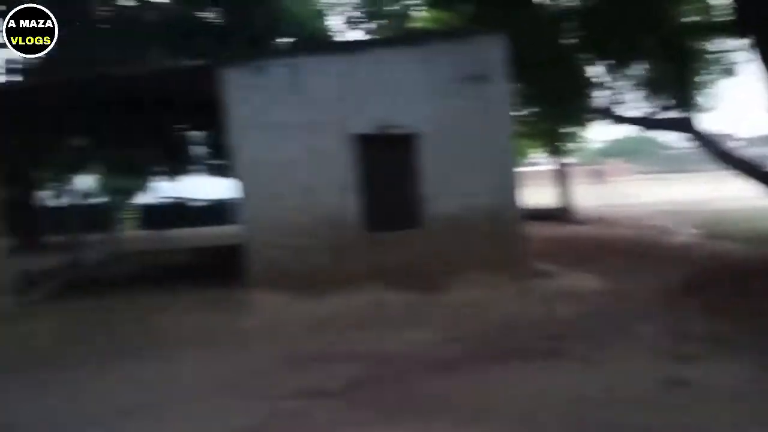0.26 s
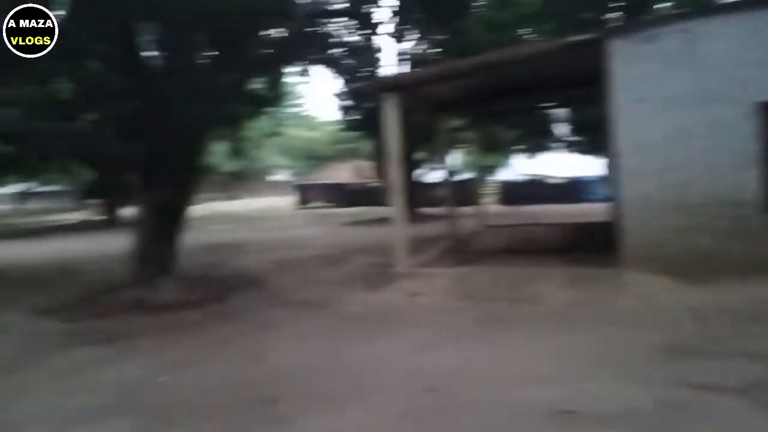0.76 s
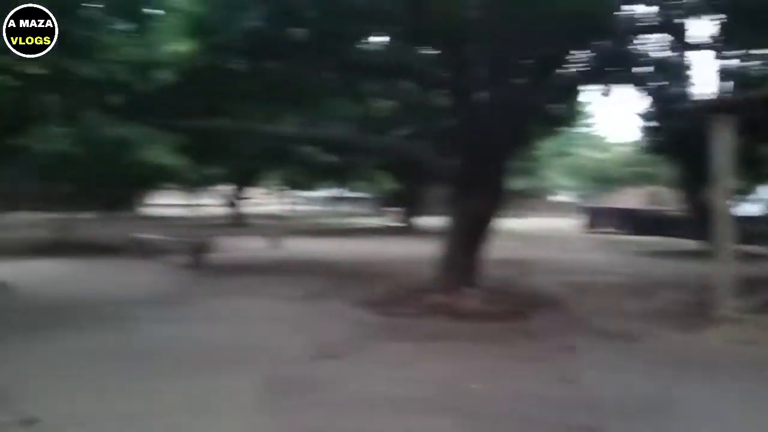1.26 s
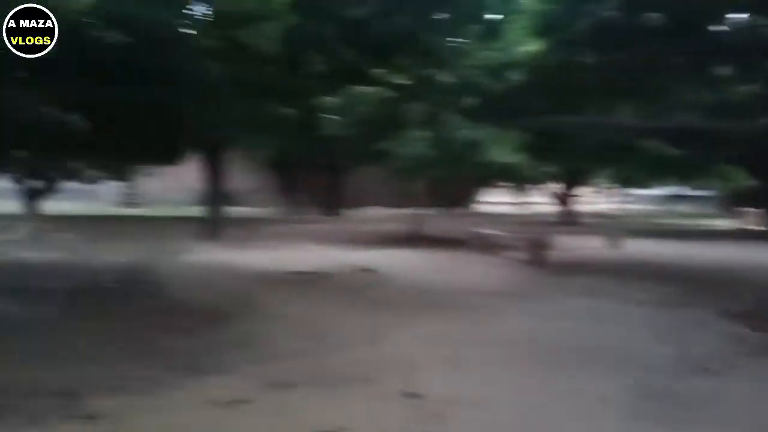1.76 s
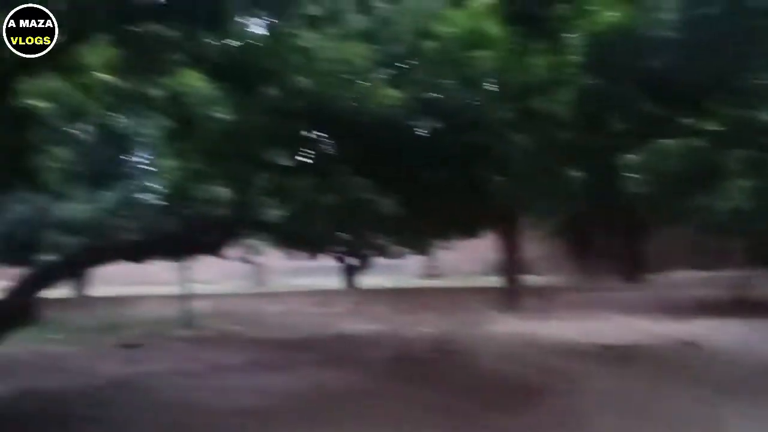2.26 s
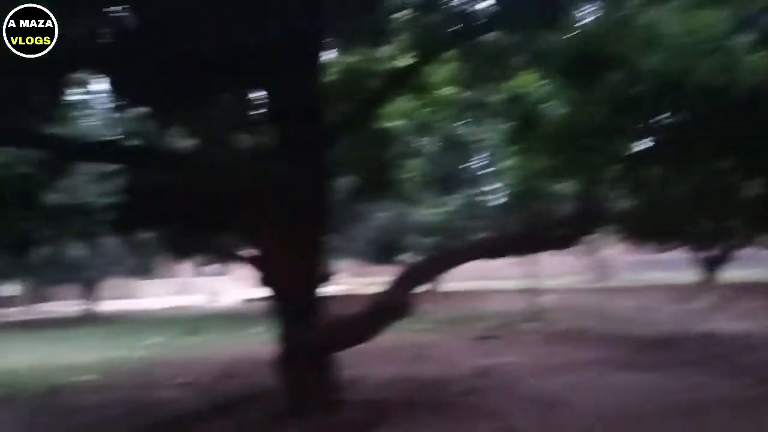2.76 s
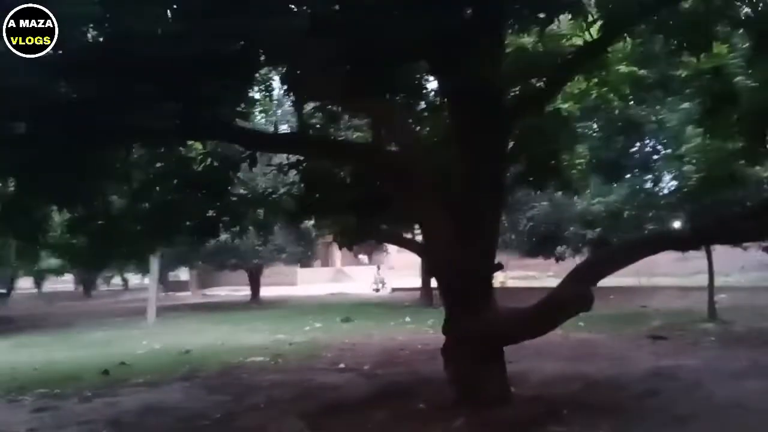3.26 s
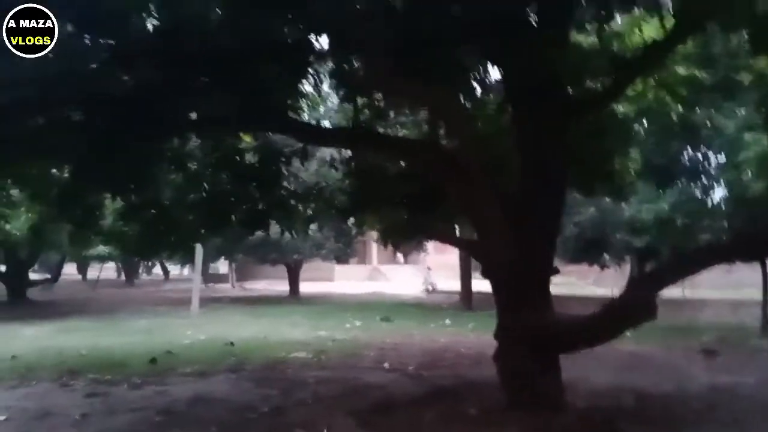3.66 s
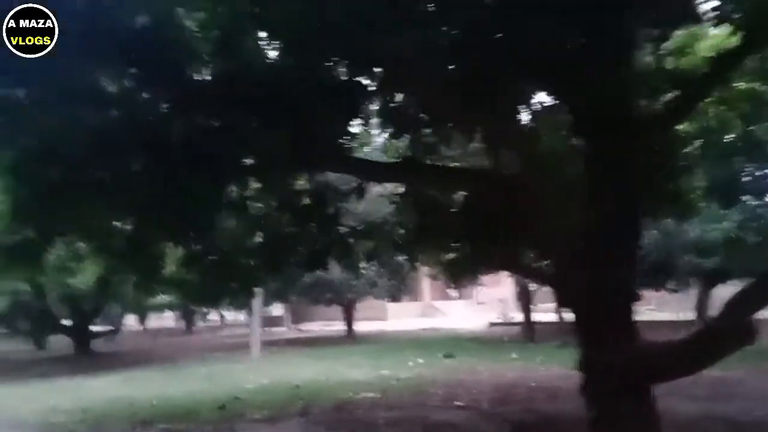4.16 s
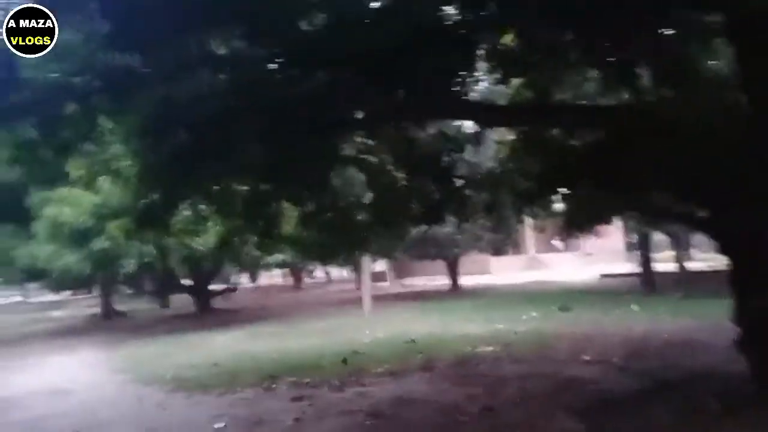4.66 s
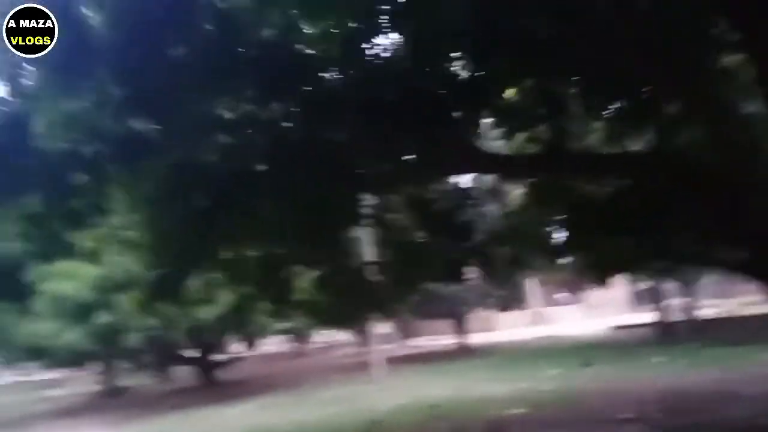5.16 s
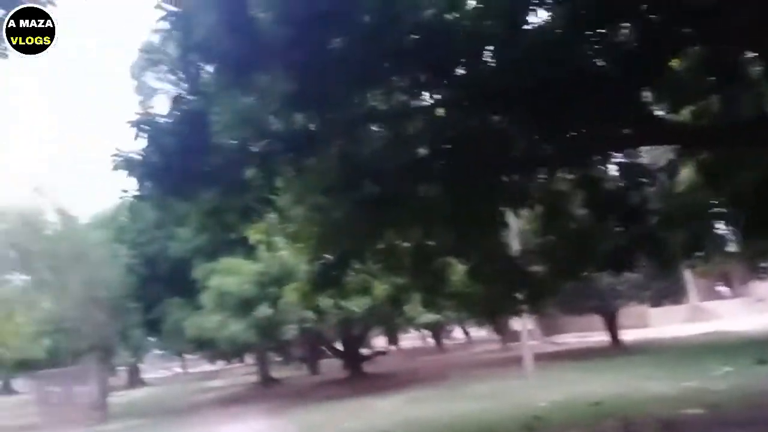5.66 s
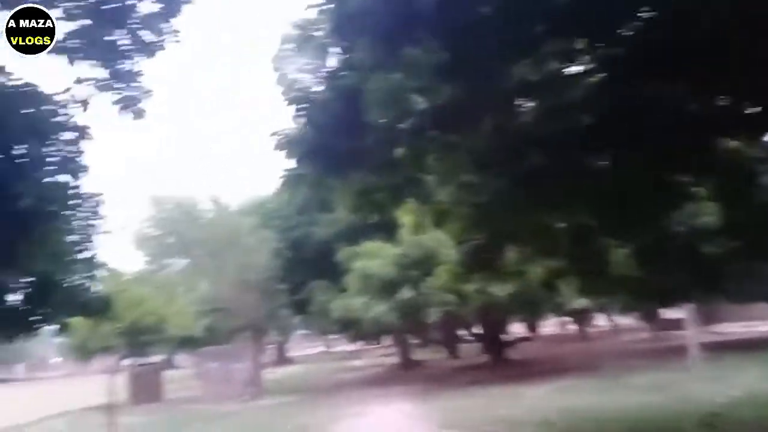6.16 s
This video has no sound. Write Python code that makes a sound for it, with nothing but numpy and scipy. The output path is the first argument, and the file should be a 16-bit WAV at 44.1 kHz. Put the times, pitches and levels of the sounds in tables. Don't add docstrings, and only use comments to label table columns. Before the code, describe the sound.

Cicadas drone steadily through an orchard, one nearer insect swelling and fading, while small birds slur and chirp, distant fowl call, and twigs snap underfoot.

```python
import sys
import numpy as np
from scipy import signal
from scipy.fft import rfft, irfft, next_fast_len
from scipy.io import wavfile
from scipy.ndimage import uniform_filter1d

SR = 44100
rng = np.random.default_rng(int(sys.argv[2]) if len(sys.argv) > 2 else 0)


def makeup_ratio(level_db):
    decades = np.asarray(level_db, float) / 20
    return 10 ** decades


def materialize(psi):
    bounded = np.clip(np.atleast_2d(psi).T, -1, 1)
    quanta = np.round(bounded * 32767).astype(np.int16)
    wavfile.write(sys.argv[1], SR, quanta)


N = 282681
T = np.arange(N) / SR


def rms_one(x):
    return x / np.sqrt(np.mean(np.abs(x) ** 2) + 1e-20)


def in_time(rows):
    s, level_db = np.transpose(rows)
    return np.interp(T, s, level_db)


def drift(rate_hz, size=N):
    r = np.exp(-32 * np.pi * rate_hz / SR)
    noise = rng.standard_normal(size // 16 + 1002)
    slow = signal.lfilter([1], [1, -2 * r, r * r], noise)[1000:]
    return np.interp(np.arange(size) / 16, np.arange(len(slow)), rms_one(slow))


def colour(x, spectrum):
    hz, level_db = np.transpose(spectrum)
    padded = next_fast_len(N)
    axis = np.fft.rfftfreq(padded, 1 / SR) + 1
    gain = makeup_ratio(np.interp(np.log(axis), np.log(hz), level_db, left=-150, right=-150))
    return rms_one(irfft(rfft(x, padded) * gain)[:N])


def butter(x, order, hz, kind):
    return signal.sosfilt(signal.butter(order, hz, kind, fs=SR, output="sos"), x)


def resonance(x, hz, width_hz):
    r = np.exp(-np.pi * width_hz / SR)
    poles = [1, -2 * r * np.cos(2 * np.pi * hz / SR), r * r]
    return signal.lfilter([(1 - r * r) / 2, 0, (r * r - 1) / 2], poles, x)


def trees(x, t60, wet_db):
    age = T[:SR // 2]
    tail = rng.standard_normal(len(age)) * makeup_ratio(-60 * age / t60) * np.minimum(age / 0.0096, 1)
    tail = tail / np.sqrt(np.sum(tail ** 2))
    return x + makeup_ratio(wet_db) * signal.fftconvolve(x, tail)[:N]


def smooth_cells(cells, bands, frames):
    return uniform_filter1d(uniform_filter1d(cells, size=bands, axis=0), size=frames, axis=1)


def click_train(per_s, start, jitter, wander=0):
    k = np.arange(int(T[-1] * per_s) - 1)
    slow = drift(4)[(k / per_s * SR).astype(int)]
    at = (k + 1 - start + jitter * rng.standard_normal(len(k)) + wander * slow) / per_s
    strength = makeup_ratio(0.32 * rng.standard_normal(len(k)))
    clicks = np.full(N, 1e-18)
    clicks[np.clip(at * SR, 0, N - 1).astype(int)] = (-1.) ** k * strength
    return clicks


def ribs(x, rings):
    return x + sum(makeup_ratio(ring_db) * resonance(x, hz, width_hz) for hz, width_hz, ring_db in rings)


def far_cicadas():
    # (time [s], level [dB])
    drone = [(0, -35), (.4, -38), (1.8, -37), (3.6, -36.5), (4.6, -37.5), (5.0, -38), (5.35, -36.5),
             (6.41, -39)]
    # (frequency [Hz], density [dB per Hz])
    body_spectrum = [(3290, -2.5), (5600, -26.5), (6000, -13), (6850, 3.5), (7800, 4), (8800, -9.5),
                     (9430, -21), (11500, -31.5), (15000, -86), (22000, -120)]
    top_spectrum = [(10800, -27), (11500, -17), (12300, -6), (14700, 0.5), (15650, 1.0)]
    # (frequency [Hz], width [Hz], level [dB])
    shared_rings = [(7146, 48, -4.5), (7710, 59, -1), (5970, 52, -3.5)]
    # (time [s], level [dB])
    facing = [
        (0, -5),
        (1.8, -3),
        (4.1, -0.5),
        (5.35, -9),
        (6.41, -5),
    ]
    swarm = 0
    for per_s, throb_hz in zip(rng.uniform(380, 450, 12), rng.uniform(20, 33, 12)):
        throb_db = 4.0 * np.cos(2 * np.pi * throb_hz * T + 3 * drift(.5)) + .6 * drift(1.5)
        swarm = swarm + click_train(per_s, 0, jitter=.15) * makeup_ratio(throb_db)
    body = colour(ribs(trees(swarm, t60=.5, wet_db=0), shared_rings), body_spectrum)
    body = butter(makeup_ratio(in_time(drone)) * body, 12, 5750, "high")
    flutter_db = 2.2 * drift(14) + 1.6 * drift(4.5)
    top = colour(trees(swarm, t60=.2, wet_db=-31), top_spectrum)
    return body + makeup_ratio(-60.5 + in_time(facing) + flutter_db) * top


def near_cicada():
    # (time [s], level [dB])
    effort = [
        (.9, -67),
        (1.2, -44.5),
        (1.75, -36),
        (2.0, -31),
        (2.3, -29.5),
        (2.6, -33),
        (3.3, -40),
        (4.3, -46.5),
        (4.7, -74),
    ]
    # (time [s], level [dB])
    top_under = [(1.1, -19), (1.6, -10.5), (2.2, -17.5), (2.7, -23.5), (3.2, -28)]
    # (frequency [Hz], density [dB per Hz])
    drum_body = [(3410, -4), (5800, -31.5), (6070, -9.5), (6530, -17.5), (7070, 1.5), (7440, 1.5),
                 (8400, -4), (8790, -12), (8910, -9.5), (9350, -25), (9840, -17.5), (11400, -48),
                 (14800, -54), (22000, -120)]
    drum_top = [(6650, -44), (11400, -17), (12800, -5), (14700, 1), (15650, 0.5)]
    # (frequency [Hz], width [Hz], level [dB])
    drum_rings = [(6870, 77, 0), (7175, 41, 3.5), (7390, 36, -0.5), (7680, 45, 5), (8070, 26, 6),
                  (8540, 47, 3)]
    # (loudest point within the throb cycle [0-1], depth of the rest [dB])
    throbs = [(.6, 9), (.3, 9)]
    clicks_per_s, throbs_per_s = 416.28, 26.85
    clicks = click_train(clicks_per_s, .32, jitter=.04, wander=.06)
    clicks = trees(clicks, t60=.15, wet_db=-1.5)
    effort_db = in_time(effort)
    levels_db = (effort_db, effort_db + in_time(top_under))
    out = 0
    for spectrum, (peak, depth_db), level_db in zip((drum_body, drum_top), throbs, levels_db):
        cycle = np.sin(np.pi * (throbs_per_s * T - peak)) ** 4
        throb = makeup_ratio(-depth_db * makeup_ratio(1.6 * drift(6)) * cycle)
        out = out + makeup_ratio(level_db) * colour(ribs(clicks * throb, drum_rings), spectrum)
    return butter(out, 12, 5750, "high")


def sung_notes(table, warble_hz, flutter_db, bend, trill_hz):
    out = np.zeros(N)
    for start, length, from_hz, to_hz, level_db in table:
        a, b = int(start * SR), int((start + length) * SR)
        size = b - a
        u = np.linspace(0, 1, size)
        trill = np.sin(2 * np.pi * np.cumsum(trill_hz * (1 + .1 * drift(31.5, size))) / SR)
        hz = from_hz * (to_hz / from_hz) ** (u ** bend)
        hz = hz + warble_hz * (trill + 0.299 * drift(15.5, size))
        shape = np.minimum(1, 5.0 * np.minimum(u, .6 * (1 - u))) ** 1.3
        shape = shape * makeup_ratio(level_db + flutter_db * drift(55, size))
        out[a:b] += np.sqrt(2) * shape * np.sin(2 * np.pi * np.cumsum(hz) / SR)
    return out


def sagging(table, sag):
    return [(start, length, hz, hz * sag, level_db) for start, length, hz, level_db in table]


def small_birds():
    # (start [s], length [s], from [Hz], to [Hz], level [dB])
    slurs = [(0, 0.094, 3700, 3375, -58), (3.17, .12, 3830, 3530, -62), (.14, 0.3, 4540, 3530, -55.5),
             (.36, 0.35, 3460, 3100, -73), (.75, 0.13, 3500, 4980, -59), (.86, 0.14, 4860, 4800, -65),
             (.87, .1, 4440, 4380, -73), (1.0, 0.11, 4200, 3700, -58), (1.07, .11, 3800, 3770, -64),
             (1.31, 0.1, 3054, 3400, -55.5), (1.43, 0.117, 3680, 3750, -55.5),
             (1.8, 0.073, 4300, 3700, -55), (4.62, .25, 3800, 3500, -57), (5.07, 0.1794, 3520, 3450, -60.5),
             (1.66, 0.13, 2753, 3116, -54.5), (1.785, .06, 4730, 3730, -53),
             (1.82, 0.14, 3870, 3790, -54.5), (1.26, 0.11, 3910, 3580, -58),
             (1.95, 0.25, 4003, 3684, -47.5), (2.41, .1, 3800, 3610, -50), (2.49, 0.19, 3340, 3210, -58),
             (.29, .09, 3980, 3750, -50.5), (3.07, 0.16, 3647, 3520, -50), (2.16, 0.18, 3754, 3500, -49.5),
             (2.37, .31, 4110, 3170, -49), (2.645, 0.39, 4345, 3410, -48), (3.05, 0.33, 3707, 3120, -52.5),
             (3.39, 0.16, 3900, 3290, -52.5), (3.52, 0.15, 3400, 3606, -54),
             (3.71, 0.22, 4420, 3370, -47.5), (4.2, 0.29, 4030, 3177, -49), (4.58, 0.33, 4110, 3732, -49),
             (4.77, 0.13, 3450, 3377, -62), (.92, 0.038, 3365, 3150, -55.5),
             (4.97, 0.12, 3833, 3830, -52.5), (5.06, 0.11, 3550, 3275, -50.5)]
    # (start [s], length [s], pitch [Hz], level [dB])
    chips = [(.41, 0.075, 3210, -59), (.51, 0.037, 3220, -62), (4.5, 0.048, 3800, -74),
             (.63, 0.11, 2760, -67.5), (.63, 0.084, 4110, -64.5), (.925, 0.015, 3405, -48),
             (.98, 0.1, 3330, -68), (1.12, 0.023, 3360, -54), (1.53, 0.16, 3327, -63.5),
             (1.9, 0.15, 3000, -67.5), (2.1, 0.09, 2460, -63), (3.1, 0.041, 5350, -55.5),
             (3.31, 0.044, 2533, -51), (3.67, 0.075, 2806, -54.5), (4.16, 0.048, 1944, -49),
             (4.68, 0.18, 2880, -61), (4.95, 0.087, 3037, -62.5), (5.47, 0.18, 3750, -75),
             (1.65, .07, 3730, -71), (5.17, 0.27, 5950, -70), (5.24, .12, 5150, -76), (1.4, .03, 4450, -70),
             (.4, .03, 4450, -69), (2.95, .04, 5150, -66)]
    # (start [s], length [s], from [Hz], to [Hz],
    # level [dB])
    glides = [(1.25, .085, 4150, 2980, -50), (1.385, .075, 3560, 3920, -50), (1.73, .13, 2520, 1930, -63),
              (2.345, .05, 2500, 2480, -60), (.575, .05, 2960, 2760, -52), (.405, .04, 2950, 2960, -52.5),
              (.5, .045, 2560, 2550, -56), (.34, .07, 2650, 2480, -65), (1.61, .07, 2560, 2800, -57),
              (6.27, .1, 1750, 1400, -61), (6.295, .06, 3200, 3120, -59)]
    song = sung_notes(slurs, 115, flutter_db=3.5, bend=0.74, trill_hz=161.0)
    clear = sung_notes(sagging(chips, .975), 50, flutter_db=5.5, bend=0.98, trill_hz=98.0)
    clear = clear + sung_notes(glides, 35, flutter_db=4.5, bend=0.9, trill_hz=59.0)
    return trees(song, t60=0.52, wet_db=2.0) + trees(clear, t60=0.33, wet_db=-1.0)


def whistles():
    # (start [s], length [s], level [dB], loudest pitch [Hz], scattered share [dB])
    falls = [
        (5.672, .172, -43, 3500, 3),
        (5.928, .16, -49, 4300, -5),
    ]
    # (share of the length [0-1], pitch [Hz])
    fall_pitch = [(0, 5780), (.12, 5600), (.33, 4450), (.55, 3750), (.8, 3080), (1, 2420)]
    edge_s, db_per_octave = 0.012, 5
    out = np.zeros(N)
    for start, length, level_db, loudest_hz, wet_db in falls:
        age = T[T < length]
        shape = np.minimum(1, np.minimum(age, length - age) / edge_s)
        pitch_hz = np.interp(age / length, *np.transpose(fall_pitch))
        pitch_hz = uniform_filter1d(pitch_hz, size=700, mode="nearest") + 45 * drift(90, len(age))
        off_octaves = np.abs(np.log2(pitch_hz / loudest_hz))
        swell_db = level_db + 4.5 - db_per_octave * off_octaves + 2.9 * drift(32, len(age))
        a = int(start * SR)
        note = np.zeros(N)
        note[a:a + len(age)] = shape * makeup_ratio(swell_db) * np.sin(2 * np.pi * np.cumsum(pitch_hz) / SR)
        out += trees(note, t60=0.49, wet_db=wet_db)
    return resonance(out, 3600, 4500)


def coos_and_hoots():
    # (start [s], length [s], from [Hz], to [Hz], level [dB])
    coos = [(.07, 0.11, 630, 645, -69.5), (.3, .05, 805, 960, -77), (.66, 0.58, 816, 764, -72),
            (1.04, 0.082, 569, 580, -71), (1.94, 0.072, 680, 630, -58), (2.04, 0.59, 694, 624, -61.5),
            (2.61, 0.048, 663, 682, -54.5), (2.66, 0.11, 647, 624, -73), (2.88, 0.1443, 634, 748, -65),
            (3.07, 0.5, 719, 681, -60.5), (3.58, 0.13, 611, 711, -68), (3.71, 0.17, 708, 770, -56.5),
            (4.92, 0.112, 1160, 1332, -54), (5.5, 0.31, 420.5, 303.6, -71.5)]
    # (start [s],
    # length [s], pitch [Hz], level [dB])
    hoots = [(.06, 0.092, 1075, -64), (.2, 0.053, 1404, -66), (.49, 0.085, 1262, -66.5),
             (.585, 0.088, 1166, -69), (.68, 0.07, 1550, -62), (.755, 0.07, 1157, -75),
             (1.55, 0.062, 996, -67), (1.62, 0.024, 1164, -58), (1.74, 0.043, 1330, -65),
             (1.79, 0.086, 1282, -66), (5.1, 0.078, 945, -58), (5.35, 0.12, 1318, -59.5),
             (5.82, 0.097, 1164, -61), (6.2, .12, 2423, -66), (2.04, 0.17, 1470, -58.5),
             (2.25, 0.11, 1470, -62.5), (2.15, 0.14, 1260, -64), (2.34, .04, 1260, -67),
             (2.6, 0.075, 1200, -65), (2.74, .25, 1440, -56.5), (3.0, .16, 1410, -50.5),
             (3.2, 0.065, 1060, -52), (3.38, .11, 1051, -50.5), (3.15, .05, 930, -63),
             (3.49, 0.08, 1232, -56)]
    calls = sung_notes(coos, 38, flutter_db=3.5, bend=1.0, trill_hz=29.93)
    calls = calls + sung_notes(sagging(hoots, .985), 28, flutter_db=-1.0, bend=3.0, trill_hz=32.7)
    return trees(calls, t60=0.29, wet_db=1.0)


def fowl(calls, spread_hz, patchy_db):
    start, length, centre_hz, call_db = np.transpose(calls)[:, :, None]
    attack_db_per_s, release_db_per_s = 699, 228
    hz = np.interp(T, (start + length / 2)[:, 0], centre_hz[:, 0])
    before_db = attack_db_per_s * (start - T).clip(0)
    after_db = release_db_per_s * (T - start - length).clip(0)
    level_db = np.max(call_db - before_db - after_db, axis=0)
    voices = 0
    for place in (-1, 0, 1):
        rough_hz = hz + spread_hz * (place + .8 * drift(5) + .4 * drift(58.9))
        voices = voices + makeup_ratio(patchy_db * drift(15.2)) * np.sin(2 * np.pi * np.cumsum(rough_hz) / SR)
    return makeup_ratio(level_db) * rms_one(voices)


def far_fowl():
    # (start [s], length [s], pitch centre [Hz], level [dB])
    low_calls = [
        (2.57, 0.31, 1220, -60.5),
        (2.86, 0.11, 1231, -52.5),
        (3.01, .2, 1135, -50),
        (3.22, .35, 1133, -50),
        (3.6, 0.36, 1200, -45),
        (4.06, 0.26, 1202, -52),
        (4.35, 0.35, 1161, -57.5),
        (4.93, 0.054, 1257, -53),
        (5.1, 0.046, 1190, -50),
        (5.36, 0.071, 1263, -61),
    ]
    mid_calls = [(.1, 0.11, 1407, -64), (.6, .17, 1550, -69), (1.01, 0.17, 1285, -57.5),
                 (1.6, 0.24, 1392, -70), (2.05, 0.29, 1373, -61), (2.53, 0.24, 1406, -54),
                 (2.78, 0.19, 1423, -51.5), (3.03, 0.27, 1394, -51.5), (3.35, 0.53, 1370, -56),
                 (4.06, 0.086, 1455, -47.5), (4.28, 0.2, 1496, -56), (4.55, 0.3, 1502, -56.5),
                 (4.97, 0.12, 1384, -49.5), (5.2, 0.3, 1450, -52.5), (5.6, 0.35, 1477, -60),
                 (5.95, 0.055, 1490, -50.5), (6.08, 0.38, 1493, -62)]
    upper_calls = [(.57, 0.039, 1643, -59), (.74, 0.06, 1980, -54.5), (2.85, 0.22, 1810, -58.5),
                   (3.12, 0.28, 1810, -55.5), (3.54, 0.38, 1790, -56.5), (4.25, 0.13, 1715, -53),
                   (4.55, 0.033, 1656, -48.5), (4.75, 0.17, 1639, -51.5), (5.07, 0.158, 1783, -52),
                   (5.25, 0.42, 1710, -56), (6.0, 0.052, 1705, -51.5), (6.22, 0.082, 1685, -59.5)]
    high_calls = [(.34, 0.28, 2560, -64.5), (1.73, 0.095, 2350, -60), (3.0, 0.19, 2395, -52.5),
                  (3.33, 0.1, 2197, -57.5), (3.55, 0.093, 2410, -65), (4.06, 0.12, 2243, -56),
                  (4.2, 0.17, 2310, -48), (4.45, .55, 2363, -58), (5.07, .12, 2196, -58),
                  (5.45, 0.35, 2400, -63), (5.8, 0.3, 2248, -63)]
    far = fowl(low_calls, 60, patchy_db=5) + fowl(mid_calls, 55, patchy_db=3.5)
    far = far + fowl(upper_calls, 90, patchy_db=4.0) + fowl(high_calls, 170, patchy_db=4.5)
    return makeup_ratio(-2.0) * trees(far, t60=0.67, wet_db=-9.5)


def crunch():
    # (start [s], length [s], level [dB], dullest [Hz], brightest [Hz])
    crushes = [(0.745, 0.068, -52.5, 2600, 4600), (2.135, 0.092, -50, 1280, 5000),
               (2.99, 0.066, -47.5, 3000, 5100), (3.04, 0.13, -51, 1800, 6400),
               (3.873, 0.092, -38, 760, 4700), (3.966, 0.08, -39.5, 900, 5300),
               (1.216, 0.014, -43, 2500, 5000), (4.239, 0.11, -49.5, 850, 3600),
               (1.234, 0.12, -49, 2800, 3700), (5.043, 0.065, -50, 2700, 3400),
               (6.36, 0.028, -33.5, 3600, 6800), (1.788, 0.19, -55, 3700, 5100)]
    out = np.zeros(N)
    for i, (start, length, level_db, dull_hz, bright_hz) in enumerate(crushes):
        a, size = int(start * SR), int(length * SR)
        cracks = rng.standard_normal(size) * makeup_ratio(2.1 * rng.exponential(1, size).clip(0, 4))
        cracks = cracks * (rng.random(size) < .16)
        body = butter(butter(cracks, 7, dull_hz, "high"), 4, bright_hz, "low")
        sizzle = butter(cracks, 3, [11800, 15600], "band")
        burst = rms_one(body) + makeup_ratio(-12.0) * rms_one(sizzle)
        rise = .4 * (i < 4)
        hold = 4 <= i < 7
        shape = np.interp(np.arange(size) / size, [0, rise, 1], [0, 1, hold])
        shape = shape * signal.windows.tukey(size, .15) * makeup_ratio(level_db + 4.3 * drift(82, size))
        out[a:a + size] += burst * shape
    return out


def snaps():
    # (time [s], peak [dB], ring [Hz], share of broad tick [0-1])
    twigs = [(3.878, -15.5, 1800, 0.3), (3.886, -24, 3220, .1), (3.896, -14.5, 1302, 0.5),
             (3.9166, -12, 1778, 0.2), (3.9184, -14, 2360, 0.24), (3.9216, -11.5, 1800, 0.35),
             (3.92, -24, 4890, 0.2), (3.897, -22, 3200, .1), (3.967, -23, 1600, .1),
             (3.923, -14, 1590, 0.4), (3.927, -14.5, 3270, 0.24), (3.931, -14, 2400, 0.3),
             (3.938, -12, 2320, 0.5), (3.949, -21, 2840, 0.1), (3.957, -20, 3300, .05),
             (3.986, -24, 1770, 0.04), (3.996, -17, 1600, 0.02), (4.0, -23, 4100, .2),
             (4.005, -20, 1790, 0), (4.016, -12.5, 4310, 0.52), (4.023, -22, 2370, 0.01),
             (4.04, -16, 2480, 0.6), (4.038, -19.5, 3170, 0.25), (4.042, -23, 3670, 0.05),
             (4.303, -27, 3930, 0), (4.326, -19.5, 2377, 0.36), (4.424, -31, 2350, 0.3),
             (4.245, -36, 1500, 0.3), (4.302, -35, 4700, 0.23), (6.372, -31.5, 1833, 0.04),
             (6.375, -27, 4620, 0.5), (5.04, -27, 1610, 0.36), (5.04, -35, 4700, .4),
             (1.2163, -31, 3720, .1), (1.2193, -28.5, 4200, 0), (1.223, -36, 2840, 0),
             (2.1654, -27, 4355, .3), (2.185, -33, 3200, 0.1), (2.197, -38, 1640, .1),
             (2.9973, -40, 4870, .2), (2.998, -29, 3260, 0.11), (3.0197, -43, 4400, .1),
             (3.0312, -35, 3690, .1), (3.881, -22, 900, 0.2), (3.898, -22, 951, 0.1),
             (5.052, -10, 1895, 0.58), (6.37, -25.5, 4600, 0.63), (6.364, -29, 5200, 0.6)]
    out, age = np.zeros(N), T[:400]
    impulse = (age == 0).astype(float)
    tick = 5.5 * butter(impulse, 3, [1400, 5800], "band")
    tick = tick + makeup_ratio(-2.0) * butter(impulse, 3, [11800, 15500], "band")
    swell = (1 - np.exp(-age / .0007)) * np.exp(-age / .0009)
    for s, peak_db, hz, share in twigs:
        ring = 2.4 * np.sin(2 * np.pi * hz * age) * swell
        a = int(s * SR)
        out[a:a + 400] += makeup_ratio(peak_db) * ((1 - share) * ring + share * tick)
    return butter(out, 4, 720, "high")


def thud():
    centre_s, half_s, hz = 3.96, .09, 400
    press = np.exp(-((T - centre_s) / half_s) ** 4)
    soil = resonance(resonance(rng.standard_normal(N), hz, 170), hz, 170)
    return makeup_ratio(-62) * press * rms_one(soil)


def handling():
    # (time [s], peak [dB])
    shifts = [
        (.03, -97.5),
        (2.52, -66),
        (3.0, -82),
        (5.93, -71),
        (6.24, -62),
        (6.33, -86),
    ]
    lumps = sum(makeup_ratio(peak_db) * np.exp(-((T - s) / 0.069) ** 2) for s, peak_db in shifts)
    return lumps * rms_one(resonance(resonance(rng.standard_normal(N), 77, 47), 77, 45))


def cricket():
    hz = 5200
    hiss = resonance(resonance(rng.standard_normal(N), hz, 120), hz, 120)
    return makeup_ratio(-79 + 4 * drift(5)) * rms_one(hiss)


def patchy(x, depth_db):
    hz, s, cells = signal.stft(x, SR, nperseg=512)
    field = rms_one(smooth_cells(rng.standard_normal(cells.shape), 3, 14))
    depth = depth_db * np.where(hz > 250, 1, .5)[:, None]
    return rms_one(signal.istft(cells * makeup_ratio(depth * field), nperseg=512)[1][:N])


def orchard_air():
    # (frequency [Hz], density [dB per Hz])
    air_spectrum = [(15, -35), (25, -16), (43, -10), (85, 1.5), (157, 0.5), (333, -8.5), (846, -9.5),
                    (1190, -6.5), (1330, 0), (1920, -6), (2460, -3), (2880, -8.5), (3700, -5),
                    (4650, -16.5), (5700, -17.5), (7410, -15), (12500, -120)]
    return makeup_ratio(-63.5) * patchy(colour(rng.standard_normal(N), air_spectrum), 4.6)


def shut_gaps(x, birds):
    # (from [s], to [s], low [Hz], high [Hz])
    shut_bands = [(.17, .35, 4700, 4920), (1.42, 1.47, 4500, 4950), (1.48, 1.56, 4500, 4720),
                  (2.0, 2.09, 4580, 5020), (2.24, 2.48, 4300, 4950), (2.48, 2.6, 4360, 4560),
                  (2.77, 2.87, 4520, 4950), (2.91, 2.96, 4380, 4560), (3.24, 3.37, 4000, 4600),
                  (3.42, 3.57, 4200, 4600), (3.61, 3.65, 4000, 4450), (3.78, 3.85, 4680, 5000),
                  (4.69, 4.76, 4600, 5000)]
    gap_db, quiet_db = -40, -60
    hz, s, cells = signal.stft(x, SR, nperseg=1024)
    song = smooth_cells(np.abs(signal.stft(birds, SR, nperseg=1024)[2]), 5, 3)
    ragged_hz = hz[:, None] + np.interp(s, T, 70 * drift(10))
    shut = np.zeros(cells.shape, bool)
    for a, b, low_hz, high_hz in shut_bands:
        shut |= (s > a) & (s < b) & (ragged_hz > low_hz) & (ragged_hz < high_hz)
    closed = shut & (song < makeup_ratio(quiet_db))
    return signal.istft(cells * makeup_ratio(gap_db * closed), nperseg=1024)[1][:N]


def scene():
    insects = far_cicadas() + near_cicada() + cricket()
    birds = small_birds()
    litter = trees(crunch() + snaps(), t60=0.31, wet_db=-6.5)
    bed = shut_gaps(birds + orchard_air() + insects + litter, birds)
    return (bed + whistles() + coos_and_hoots() + far_fowl() + thud() + handling())[None]


def band_limit(x):
    return signal.sosfilt(signal.butter(12, 16530, fs=SR, output="sos"), x)


def record(dry):
    cut = signal.ellip(12, .5, 70, 15540, fs=SR, output="sos")
    return band_limit(signal.sosfilt(cut, dry))


dry = scene()
out = record(dry)
materialize(out)
```